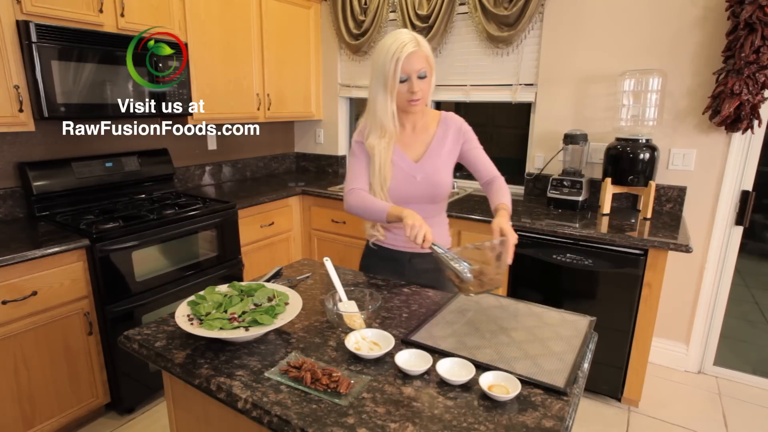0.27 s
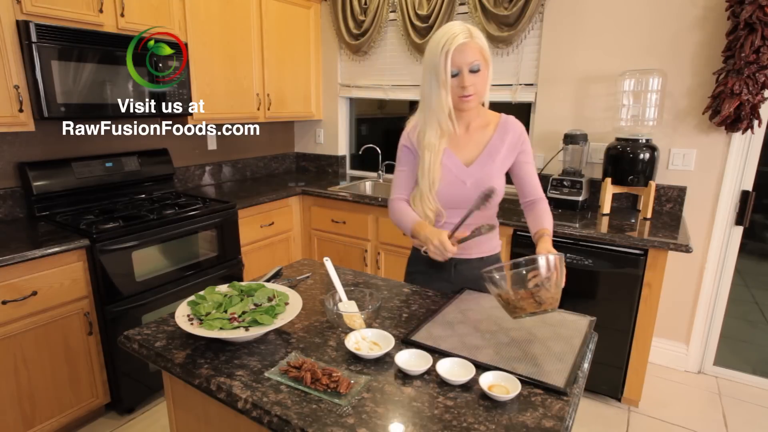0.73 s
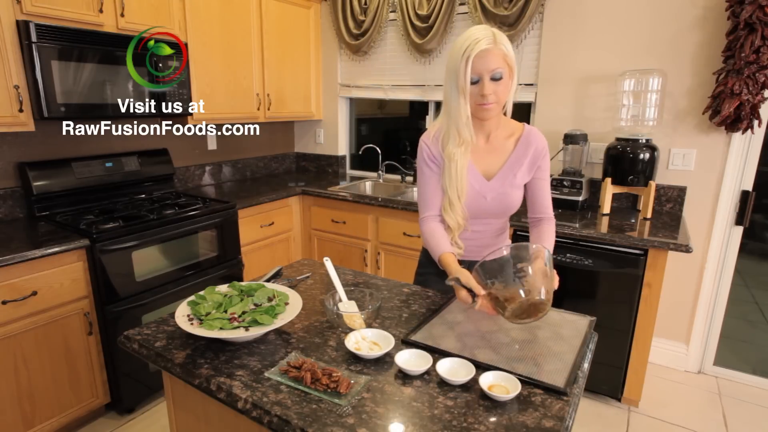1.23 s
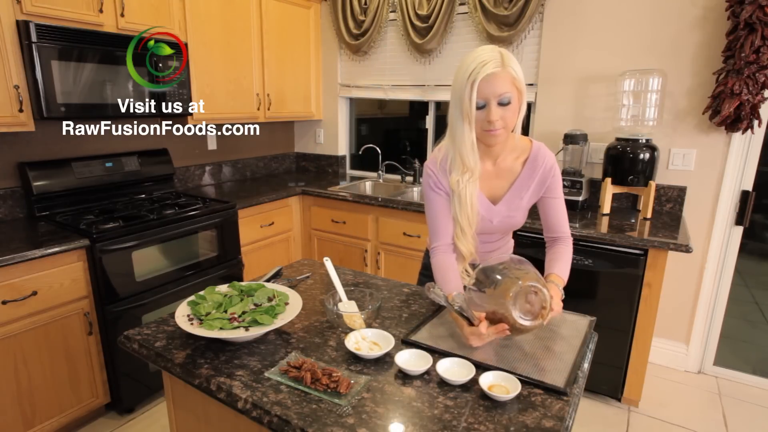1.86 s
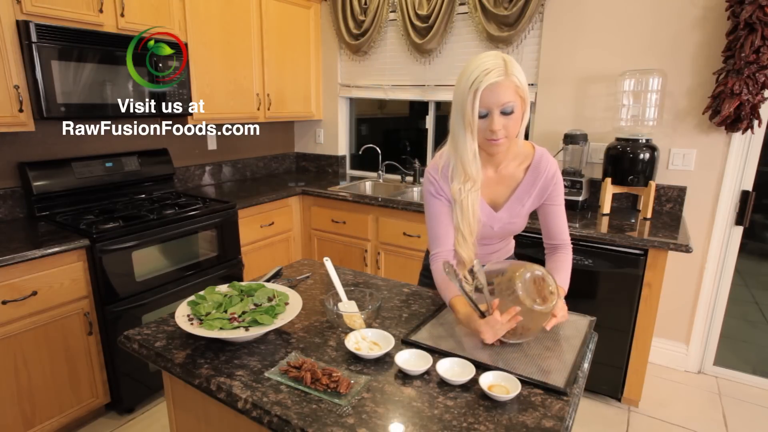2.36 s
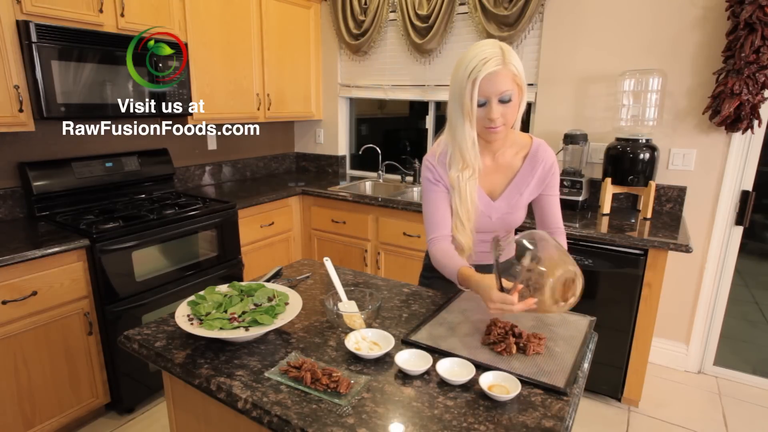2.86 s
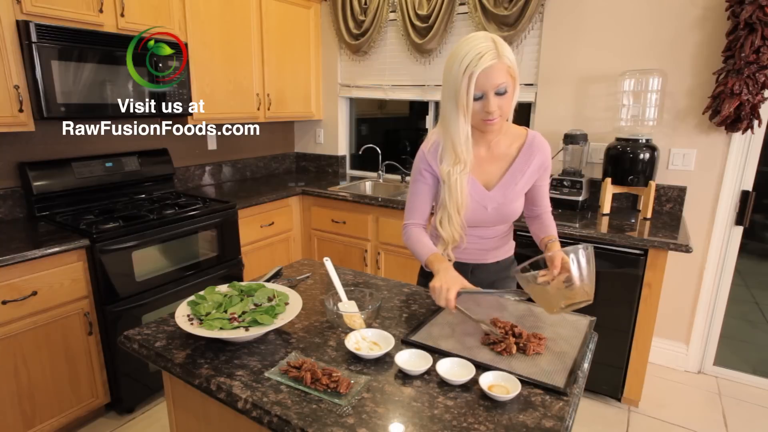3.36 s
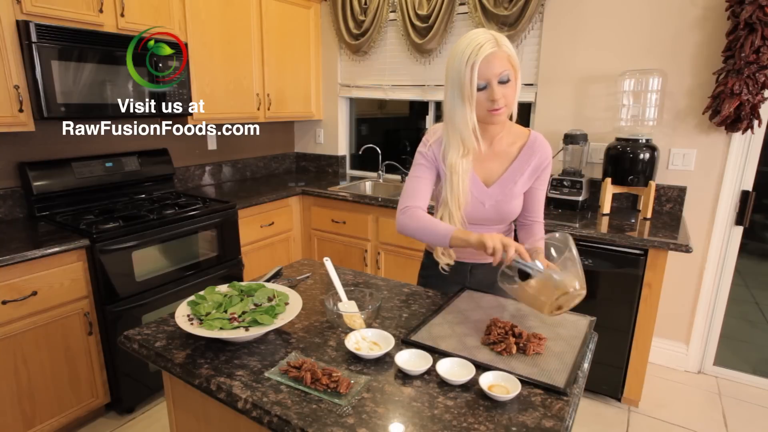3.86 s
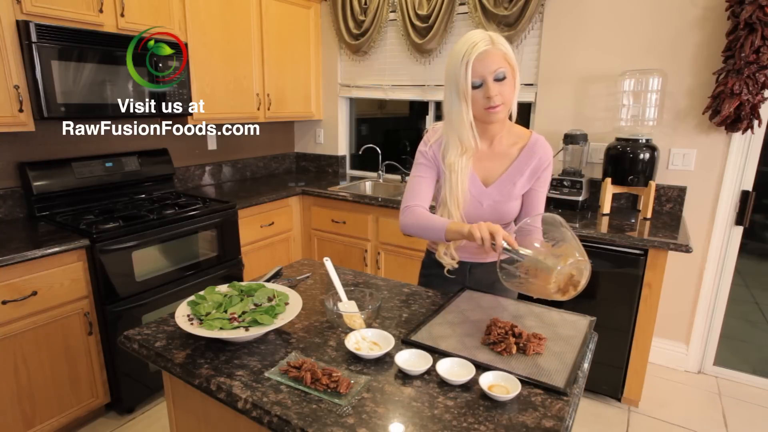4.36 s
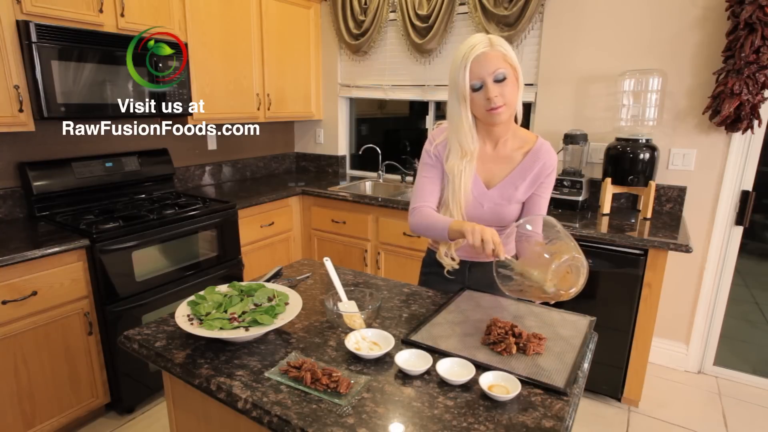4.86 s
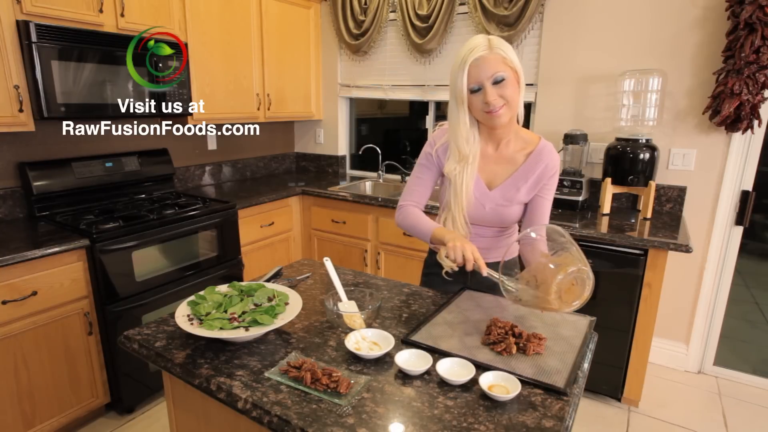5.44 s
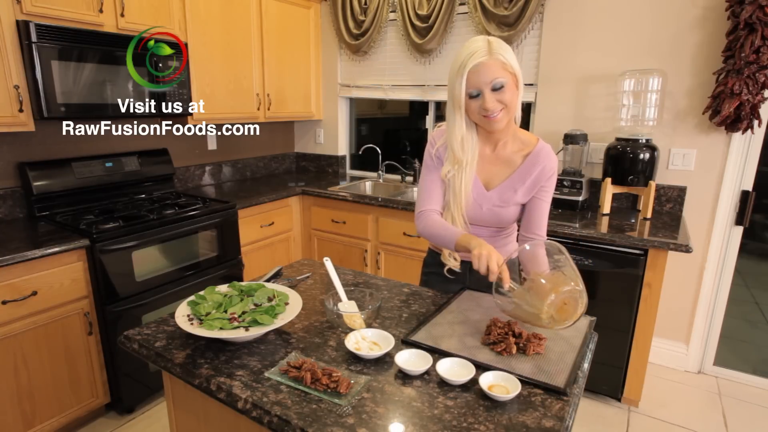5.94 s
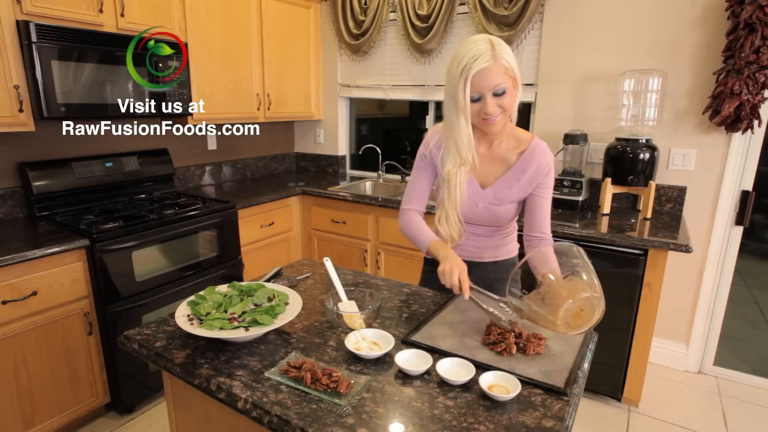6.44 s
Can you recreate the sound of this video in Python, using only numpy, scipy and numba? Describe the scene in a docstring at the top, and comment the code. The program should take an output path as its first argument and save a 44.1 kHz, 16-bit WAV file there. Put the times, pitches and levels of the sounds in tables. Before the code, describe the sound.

Brief glass scrapes, a soft tray boom and pattering clumps of nuts give way to hard blade clacks and loud, sharp glass clinks over faint hiss.

```python
"""In a live kitchen, a steel knife scrapes sticky nuts out of a hand-held glass bowl onto a papered tray.
Random slips of the blade make the bowl's modes sing or rasp in the coating; short chatters make the
clacks, and a steel tick with decaying glass modes makes each clink. Nuts patter as random impacts,
handling bumps and the tray booms softly, over hiss and an appliance's whine. Everything reaches one
microphone, whose gain control ducks after the hardest clinks."""
import sys
import numpy as np
from scipy import signal
from scipy.fft import rfft, irfft, next_fast_len
from scipy.io import wavfile
from scipy.ndimage import uniform_filter1d, minimum_filter1d, map_coordinates
from numba import njit

SR = 44100
rng = np.random.default_rng(int(sys.argv[2]) if len(sys.argv) > 2 else 0)


def wav_out(sig):
    """Save sig, one row per channel (or a flat mono array), as 16-bit PCM at SR to the path in sys.argv[1]."""
    wavfile.write(sys.argv[1], SR, np.round(np.clip(np.atleast_2d(sig).T, -1, 1) * 32767).astype(np.int16))


N = 295370
T = np.arange(N) / SR  # s since the start
AGE = np.arange(SR // 2) / SR  # s since a blow


def amp(db):
    """Decibels to gain."""
    return 10 ** (np.asarray(db) / 20)


def unit(x):
    """Scale to rms 1."""
    return x / np.sqrt(np.mean(x ** 2) + 1e-20)


def crest(x):
    """Scale so that the loudest two milliseconds have rms 1."""
    power = uniform_filter1d(x ** 2, SR // 500, mode="constant")
    return x / np.sqrt(power.max())


def along(points, hz):
    """Read (Hz, value) points on a log frequency axis."""
    point_hz, values = np.transpose(points)
    return np.interp(np.log(hz + 1), np.log(point_hz + 1), values)


def fade(t60, t=AGE):
    """Exponential decay, 60 dB down after t60 seconds (at least 1 ms)."""
    return amp(-60 * t / np.maximum(t60, 1e-3))


def add(track, start_s, sound):
    """Mix a sound in at start_s."""
    start = max(round(start_s * SR), 0)
    track[start:start + len(sound)] += sound[:N - start]


def colour(x, gain):
    """Causal minimum-phase filter with the given gain as a function of frequency."""
    size = 2 * next_fast_len(len(x) // 2 + 4096)
    log_gain = np.log(np.maximum(gain(np.fft.rfftfreq(size, 1 / SR)), 1e-6))
    cepstrum = irfft(log_gain)
    # folding the cepstrum onto positive times makes the filter causal
    cepstrum[1:size // 2] *= 2
    cepstrum[size // 2 + 1:] = 0
    response = np.exp(rfft(cepstrum))
    return irfft(rfft(x, size) * response, size)[:len(x)]


def shaped(x, spectrum, peaks=()):
    """Give x a colour from (Hz, dB) points, lifted or cut at (Hz, width Hz, dB) resonances."""
    def gain(hz):
        lift_db = sum(db / (1 + (2 * (hz - centre) / width) ** 2) for centre, width, db in peaks)
        return amp(along(spectrum, hz) + lift_db)
    return colour(x, gain)


def burst(t60):
    """A dying rattle of tiny contacts: decaying noise, flattened in spectrum, then faded over twice t60."""
    spectrum = rfft(rng.standard_normal(len(AGE)) * fade(t60))
    flat = irfft(spectrum / np.abs(spectrum), len(AGE))
    return flat * fade(t60 * 2)


def grains(rate, spread_db):
    """Random impulses of uneven size and either sign, rate a second on average."""
    hits = rng.random(N) < rate / SR
    signs = rng.choice([-1, 1], N)
    sizes_db = spread_db * np.clip(rng.standard_normal(N), -2, 2)
    return hits * signs * amp(sizes_db)


def wobble(rate):
    """A smooth random curve, rate knots a second."""
    knots = rng.standard_normal(int(T[-1] * rate) + 4)
    return map_coordinates(knots, [T * rate])


def strokes(rows, attack_s, release_s):
    """Gain per sample: strokes swell up to their start, hold, then die away (both slopes as t60)."""
    total = 0
    for start_s, length_s, level_db in rows:
        swell = fade(attack_s, np.maximum(start_s - T, 0))
        dying = fade(release_s, np.maximum(T - start_s - length_s, 0))
        total = total + amp(level_db) * swell * dying
    return total


# how long the kitchen's reverberation lasts: pitch_hz [Hz], t60_s [s]
KITCHEN_DECAY = [(150, 0.28), (400, 0.64), (1040, 0.48), (2760, 0.57), (7280, 0.44), (12000, 0.29)]


def kitchen(x, wet_db, build_up_s=0.00074):
    """Direct sound plus a diffuse noise tail whose decay time depends on frequency."""
    hz, t, z = signal.stft(rng.standard_normal(SR * 2 // 3), SR, nperseg=256)
    decay = fade(along(KITCHEN_DECAY, hz)[:, None], t)
    tail = signal.istft(z * decay, SR, nperseg=256)[1]
    tail *= 1 - np.exp(-(np.arange(len(tail)) / SR / build_up_s) ** 2)
    response = amp(wet_db) * tail / np.linalg.norm(tail)
    response[0] = 1  # the direct sound
    return signal.fftconvolve(x, response)


def dead_hit(spectrum, peaks, t60, body_db, edge_db, wet_db):
    """A contact with no free ring: a short chatter, its body and edge weighed against its middle."""
    chatter = shaped(burst(t60), spectrum, peaks)
    bands = []
    for edges_hz in [(100, 1800), (1800, 6500), (6500, 12000)]:
        band = signal.butter(3, edges_hz, "band", fs=SR, output="sos")
        bands.append(crest(signal.sosfilt(band, chatter)))
    body, middle, edge = bands
    return kitchen(amp(body_db) * body + middle + amp(edge_db) * edge, wet_db)


# colour of the room's hush: pitch_hz [Hz], relative level_db [dB per Hz]
HUSH_COLOUR = [(20, -36), (35, -3.5), (70, 0.5), (160, -2), (340, -5), (700, -5), (1140, -8), (2750, -8.5),
               (4230, -11.5), (6300, -15.5), (12000, -18)]
# tones of an appliance: pitch_hz [Hz], level_db [dB, peak]
WHINE_TONES = [(366, -64), (2783, -61), (5566, -57.5)]


def room_tone(hush_db=-49, waver=0.00158):
    """Steady hiss and rumble with the thin whine of an appliance, slightly unsteady in pitch."""
    hiss = amp(hush_db) * unit(shaped(rng.standard_normal(N), HUSH_COLOUR))
    speed = 1 + waver * wobble(40)
    turns_s = np.cumsum(speed) / SR
    whine = sum(amp(level_db) * np.sin(2 * np.pi * pitch_hz * turns_s) for pitch_hz, level_db in WHINE_TONES)
    return hiss + whine


# modes of the glass bowl: pitch_hz [Hz], relative level_db [dB], free-ring t60_s [s]
BOWL_MODES = [(608, 1, .2), (1439, -0.5, 0.14), (2640, 3, 0.064), (4118, 5.5, 0.18), (4090, -8.5, 0.064),
              (5850, -2.5, 0.14), (6450, -9, 0.25), (6530, -10.5, 0.15), (7840, -4.5, 0.24),
              (7830, -32, 0.039), (8170, -12, 0.24), (8690, -10, 0.58), (9800, -16, 0.18), (10020, -6, 0.3)]


def bowl_modes(touch_hz, slope_db=8):
    """Columns Hz, gain, t60: a touch excites most the modes near its own pitch, slope_db less per octave."""
    hz, level_db, t60 = np.transpose(BOWL_MODES)[:, :, None]
    octaves_off = np.abs(np.log2(hz / touch_hz))
    return hz, amp(level_db - slope_db * octaves_off), t60


def friction(spectrum, touch_hz, length, grit_db):
    """Slips of the blade set the bowl's modes singing over a gritty hiss."""
    slips = grains(rate=1700, spread_db=5.5)
    hz, gain, t60 = bowl_modes(touch_hz)
    modes = gain / np.sqrt(t60) * fade(t60 * length) * np.sin(2 * np.pi * hz * AGE)
    glass = np.sum(modes, axis=0)
    singing = signal.fftconvolve(slips, glass)[:N]
    # the travelling blade loads the glass and bends its pitch a little
    bent_time = np.cumsum(1 + 0.00414 * wobble(25))
    singing = unit(map_coordinates(singing, [bent_time], mode="mirror"))
    grit = unit(shaped(slips, spectrum))
    return unit(singing + amp(grit_db) * grit)


# blade edge rubbing bare glass: start_s [s], length_s [s], level_db [dB]
RUB_STROKES = [(0, 0.0065, -32), (.19, 0.063, -41.5), (.228, 0.12, -39), (.274, 0.0051, -27),
               (1.8, 0.022, -41), (2.32, 0.11, -53), (2.915, .025, -57), (5.335, 0.033, -47),
               (5.412, 0.079, -32.5), (5.65, 0.055, -35), (6.015, .04, -35), (6.42, 0.086, -51)]
# blade skidding fast and shrill: start_s [s], length_s [s], level_db [dB]
SKID_STROKES = [(0, .006, -24.5), (5.564, 0.0056, -21.5), (6.07, 0.072, -28), (6.23, 0.027, -34.5)]
# blade ploughing through the sticky coating: start_s [s], length_s [s], level_db [dB]
PLOUGH_STROKES = [(3.86, 0.0066, -19), (3.9, 0.11, -38), (4.5, 0.044, -31.5), (4.855, .01, -33),
                  (4.94, 0.11, -38), (5.17, 0.072, -46), (5.813, 0.0062, -18), (5.925, .018, -48)]
# colour of a damped clack: pitch_hz [Hz], relative level_db [dB per Hz]
CLACK_COLOUR = [(30, -60), (120, -19.5), (280, -7), (450, -8), (650, -2), (1020, -13), (1450, -5.5),
                (1800, -8.5), (2600, -3), (3200, -1.5), (4100, -3), (5300, -5.5), (7500, -13.5),
                (11000, -18.5)]
# colour of a steel tick: pitch_hz [Hz], relative level_db [dB per Hz]
TICK_COLOUR = [(30, -97), (150, -43.5), (400, -24), (1100, -15), (2000, -10.5), (3200, 1), (4200, 1.5),
               (4800, -7.5), (6000, -5.5), (11000, -17.5)]
# resonances of blade and bowl pressed together: pitch_hz [Hz], width_hz [Hz], lift_db [dB, negative cuts]
PRESSED_PEAKS = [(585, 12, 10), (1530, 83, 2.5), (2200, 37, 7), (3050, 64, 3.5), (3470, 25, 8),
                 (5140, 170, 2.5), (7060, 90, -16)]


def scraping():
    """The blade sings on bare glass, shrills when it skids and rasps in the coating."""
    singing = friction(CLACK_COLOUR, touch_hz=1890, length=0.68, grit_db=-6)
    rub = strokes(RUB_STROKES, attack_s=0.051, release_s=0.11) * singing
    shrill = friction(TICK_COLOUR, touch_hz=3900, length=0.25, grit_db=-4)
    skid = strokes(SKID_STROKES, attack_s=0.043, release_s=0.066) * shrill
    sticking = unit(shaped(grains(rate=1400, spread_db=4.0), CLACK_COLOUR, PRESSED_PEAKS))
    rasp = strokes(PLOUGH_STROKES, attack_s=0.021, release_s=0.12) * sticking
    return kitchen(rub + skid + rasp, wet_db=-2.5)[:N]


# dull bumps of bowl, hand and tray: start_s [s], level_db [dB, before bump_db], pitch_hz [Hz]
BUMP_HITS = [(0.165, -30.5, 125), (0.264, -28.5, 373), (0.325, -44, 610), (0.688, -33, 149),
             (0.755, -21, 166), (0.912, -28.5, 260), (1.238, -32, 690), (1.999, -19.5, 88.4),
             (2.044, -22, 80), (2.137, -33, 775), (2.317, -38, 527), (3.856, -19.5, 327),
             (4.278, -27.5, 550), (4.33, -26.5, 337), (4.845, -25, 308)]
# the tray flexing under the load: start_s [s], level_db [dB]
TRAY_FLEXES = [(1.997, -17.5), (2.038, -17.5)]
# modes of the tray: pitch_hz [Hz], relative level_db [dB], t60_s [s]
TRAY_MODES = [(78.5, -3.5, 0.38), (102, -2.5, 0.16), (144, -17, 0.27)]


def thuds(bump_db=-9):
    """Handling bumps are noise bursts humped near a pitch; the flexing tray booms in decaying modes."""
    out = np.zeros(N)
    for start_s, level_db, pitch_hz in BUMP_HITS:
        push = colour(burst(t60=.06), lambda hz: (hz / pitch_hz) ** 3 / (1 + (hz / pitch_hz) ** 5))
        add(out, start_s, amp(level_db + bump_db) * kitchen(crest(push), wet_db=4.5))
    boom = sum(amp(db) * fade(t60) * np.sin(2 * np.pi * hz * AGE) for hz, db, t60 in TRAY_MODES)
    boom = boom * (1 - fade(t60=0.032))  # soft onset
    for start_s, level_db in TRAY_FLEXES:
        add(out, start_s, amp(level_db) * boom)
    # the microphone's low cut thins the deepest bass of the bumps and boom
    low_cut = signal.butter(6, 62, "high", fs=SR, output="sos")
    return signal.sosfilt(low_cut, out)


# blade landing on the coated glass and staying there: start_s [s], level_db [dB, middle band],
# bright_db [dB], strongest pitch_hz [Hz], chatter_s [s, t60 given to the burst]
CLACK_HITS = [(0.711, -12.5, 5, 2480, 0.018), (0.9871, -30.5, 0, 3000, 0.067),
              (1.036, -32.5, 0.5, 2800, 0.066), (1.2394, -35, 12, 3480, 0.045),
              (2.9459, -38.5, 3.5, 4030, 0.037), (3.2679, -22, -5.5, 3040, 0.019),
              (3.31, -28, -4, 2840, 0.018), (3.5333, -44.5, 5, 3080, 0.023), (3.843, -33, -6, 3080, 0.036),
              (3.8544, -11.5, -2, 3030, 0.088), (3.8835, -16.5, -4, 3340, 0.017),
              (3.9503, -20.5, -2.5, 4900, 0.075), (4.0709, -30.5, 0, 3200, .017),
              (4.3287, -7.5, -2.5, 3064, 0.026), (4.8441, -10, -0.5, 3520, 0.031),
              (4.9288, -14, 5, 3900, 0.06), (5.188, -36, 1.5, 4100, 0.022), (5.8087, -10.5, 2, 4370, 0.069),
              (5.8226, -10, 4, 3420, 0.076)]


def clacks(body_db=-10.5, edge_db=-6.0, focus_db=10.5, focus_width=0.091):
    """The blade lands and damps the glass; a brighter contact has more edge and less body."""
    out = np.zeros(N)
    for start_s, level_db, bright_db, pitch_hz, chatter_s in CLACK_HITS:
        peaks = [*PRESSED_PEAKS, (pitch_hz, focus_width * pitch_hz, focus_db)]
        hit = dead_hit(CLACK_COLOUR, peaks, chatter_s, body_db - bright_db, edge_db + bright_db, wet_db=-4.5)
        add(out, start_s, amp(level_db) * hit)
    return out


def bowl_ring(touch_hz, length, linger_db=-17, flutter=0.99):
    """Each mode dies fast in the hand-held glass, then lingers in the room, fluttering."""
    hz, gain, t60 = bowl_modes(touch_hz)
    knots = rng.standard_normal((len(hz), 24, 2)) @ [1, 1j]
    beating = 1 + flutter * signal.resample(knots, len(AGE), axis=1)
    room_decay = fade(along(KITCHEN_DECAY, hz)) * (1 - fade(t60=0.04))
    echo = amp(linger_db) * np.sqrt(length) * room_decay * beating
    # the echo arrives out of step with the direct ring
    envelope = gain * (fade(t60 * length) + 1j * echo)
    carrier = np.exp(2j * np.pi * (hz * AGE + rng.random(hz.shape)))
    return np.sum(envelope * carrier, axis=0).real


# blade bouncing off the glass and letting it ring: start_s [s], level_db [dB, before ring_db and tick_db],
# most excited touch_hz [Hz], length [share of the free ring's t60]
CLINK_HITS = [(1.238, -23.5, 820, 0.49), (1.794, -28.5, 1460, 1), (4.279, -24.5, 2760, 0.65),
              (5.434, -15, 2320, 0.26), (5.487, -27, 5000, 0.74), (5.4986, 6, 4200, 0.51),
              (6.049, 6.5, 4550, 0.21), (6.068, 4.5, 4160, 0.36), (6.127, -1, 4060, 0.41),
              (6.1436, 6, 4140, 0.28), (6.5302, 18, 4950, 0.17), (6.623, 3, 3910, 0.27)]


def clinks(ring_db=-7, tick_db=-7):
    """A hard tick of steel together with the ring of the glass."""
    out = np.zeros(N)
    for start_s, level_db, touch_hz, length in CLINK_HITS:
        tick = kitchen(crest(shaped(burst(t60=0.0095), TICK_COLOUR)), wet_db=-5.5)
        ring = crest(bowl_ring(touch_hz, length) * (1 - fade(t60=0.00085)))
        add(out, start_s, amp(level_db + tick_db) * tick)
        add(out, start_s, amp(level_db + ring_db) * ring)
    return out


# loose nuts sliding and tumbling out: start_s [s], length_s [s], level_db [dB]
NUT_SPILLS = [(1.795, 0.025, -36), (1.88, 0.053, -26.5), (1.95, 0.049, -26.5), (2.06, 0.13, -35.5),
              (2.25, 0.11, -44), (2.409, 0.0079, -28.5), (2.45, 0.057, -41.5), (2.59, 0.027, -32)]
# colour of nuts on paper: pitch_hz [Hz], relative level_db [dB per Hz]
PAPER_COLOUR = [(30, -43), (110, -5.5), (220, -8.5), (420, -7.5), (700, -4.5), (1000, -5.5), (1450, -4.5),
                (2200, -8.5), (3400, -6.5), (4500, -14), (9700, -30.5), (12000, -45)]


def nuts(lumpy_db=3):
    """A lumpy stream of small impacts on the paper, with bigger clumps among them."""
    impacts = grains(rate=450, spread_db=3) * amp(lumpy_db * wobble(60))
    landing = unit(shaped(impacts, PAPER_COLOUR))
    patter = strokes(NUT_SPILLS, attack_s=0.076, release_s=0.11) * landing
    return kitchen(patter, wet_db=-3.0)[:N] + clumps()


# clumps of nuts landing on the paper: start_s [s], level_db [dB, middle band], bright_db [dB],
# strongest pitch_hz [Hz]
CLUMP_DROPS = [(1.8726, -25.5, -7, 1390), (1.8812, -19.5, -2.5, 1458), (1.8874, -21, -1.5, 640),
               (1.938, -19, -3, 746), (1.9484, -16.5, -0.5, 666), (1.9814, -22, 7, 1340),
               (2.1381, -23.5, -2.5, 750), (2.2244, -33, 3, 1900), (2.3154, -42, -8.5, 536),
               (2.4022, -20, 2.5, 1090), (2.4236, -25, -1.5, 1100), (2.5192, -32, -2, 1370),
               (2.5514, -26.5, 4, 1553), (2.5643, -34, -4.5, 767), (2.5918, -20.5, 2, 1600),
               (2.638, -32, 2, 1060), (2.6622, -24, 2.5, 1450)]


def clumps(crumble_s=0.022, body_db=3, edge_db=-16, focus_db=9, focus_width=0.14):
    """Lumps of nuts hit the paper and crumble: soft ones thud, dry ones tick."""
    out = np.zeros(N)
    for start_s, level_db, bright_db, pitch_hz in CLUMP_DROPS:
        peaks = [(pitch_hz, focus_width * pitch_hz, focus_db)]
        hit = dead_hit(PAPER_COLOUR, peaks, crumble_s, body_db - bright_db, edge_db + bright_db, wet_db=-4.0)
        add(out, start_s, amp(level_db) * hit)
    return out


def scene():
    """Everything reaches one microphone, fed to both channels."""
    mono = room_tone() + scraping() + thuds() + clacks() + clinks() + nuts()
    return np.array([mono, mono])


@njit
def ducking(excess_db, attack_step, release_step):
    """Gain reduction in dB: grabs quickly on overload, lets go slowly."""
    out = np.zeros(len(excess_db))
    held = 0.0
    for i in range(len(out)):
        held += max(excess_db[i] - held, 0.0) * attack_step
        held -= held * release_step
        out[i] = held
    return out


def record(dry, threshold_db=-3, attack_s=0.00051, release_s=2.8, top_hz=12000):
    """Gain control that sees peaks a moment early, clipping of what slips past it, and the band limit."""
    excess_db = 20 * np.log10(np.abs(dry).max(axis=0) + 1e-9) - threshold_db
    excess_db = -minimum_filter1d(-excess_db, size=15)  # running maximum, centred
    ducked = dry * amp(-ducking(excess_db, 1 / (attack_s * SR), 1 / (release_s * SR)))
    clipped = np.clip(ducked, -.88, .88)
    low_pass = signal.ellip(12, .1, 100, top_hz, fs=SR, output="sos")
    return signal.sosfiltfilt(low_pass, clipped)


dry = scene()
out = record(dry)
wav_out(out)
```